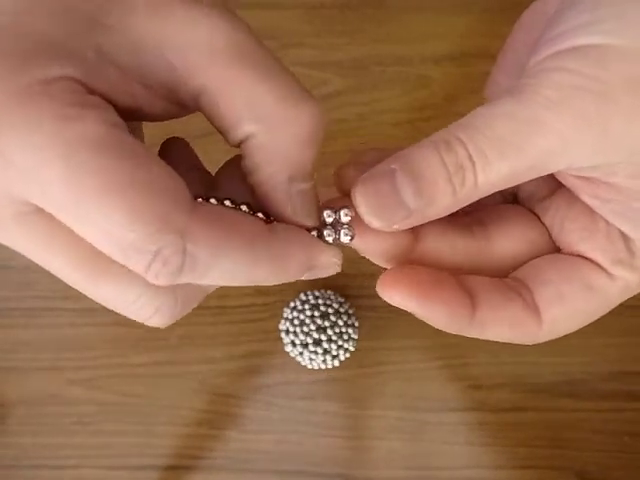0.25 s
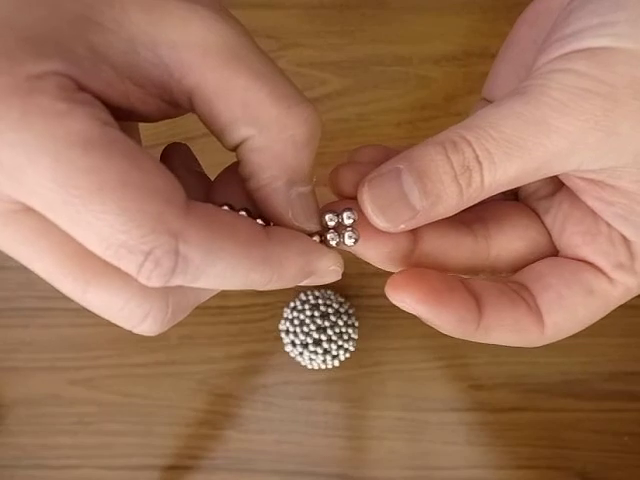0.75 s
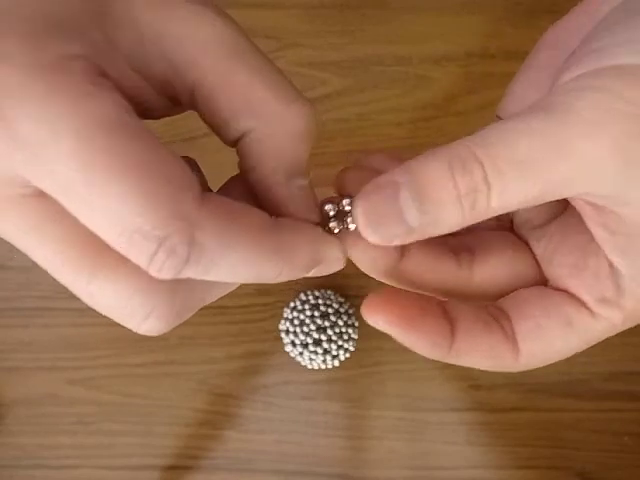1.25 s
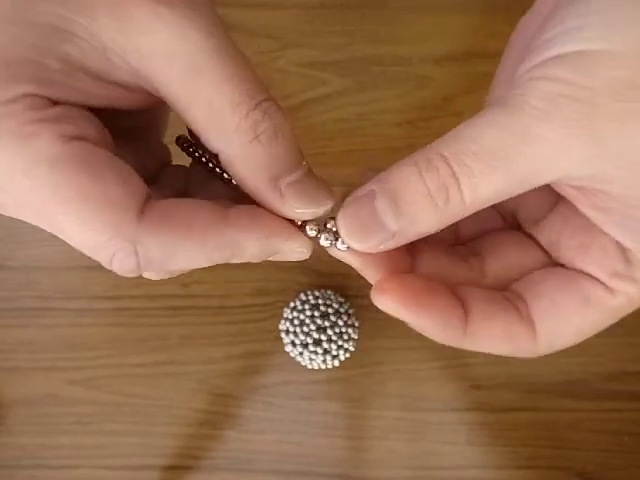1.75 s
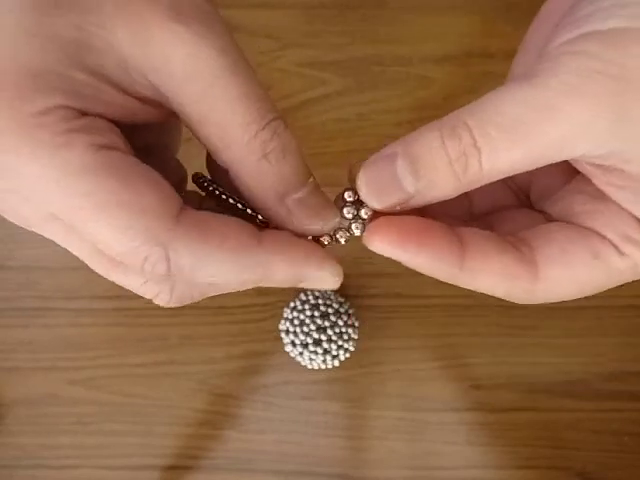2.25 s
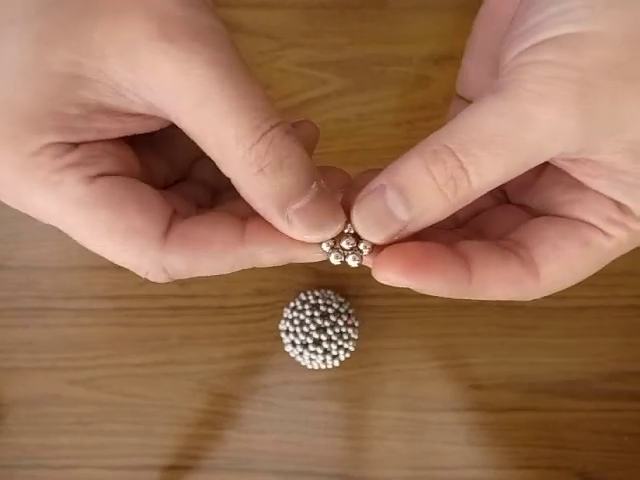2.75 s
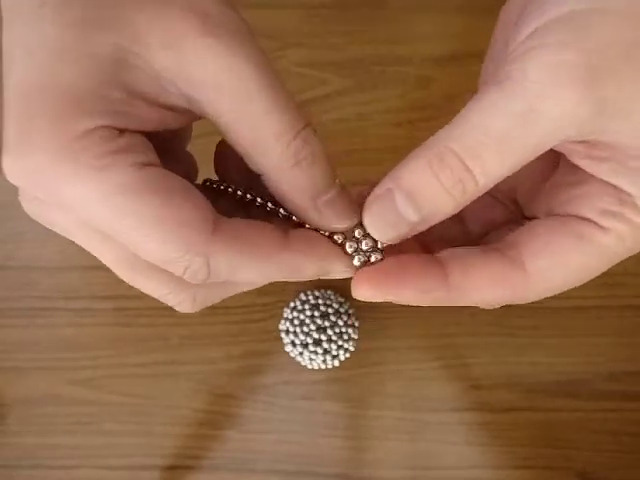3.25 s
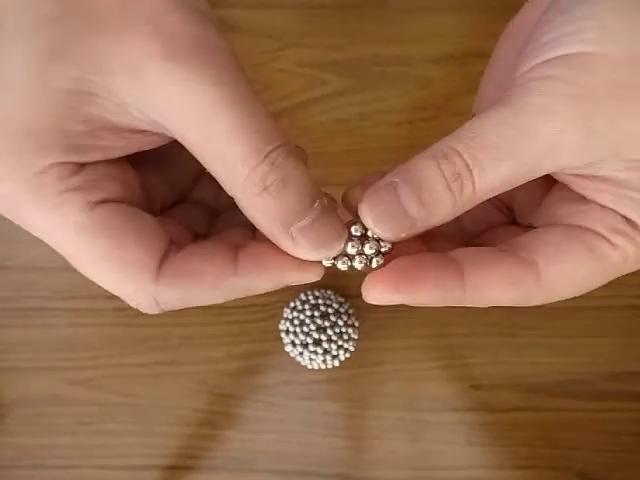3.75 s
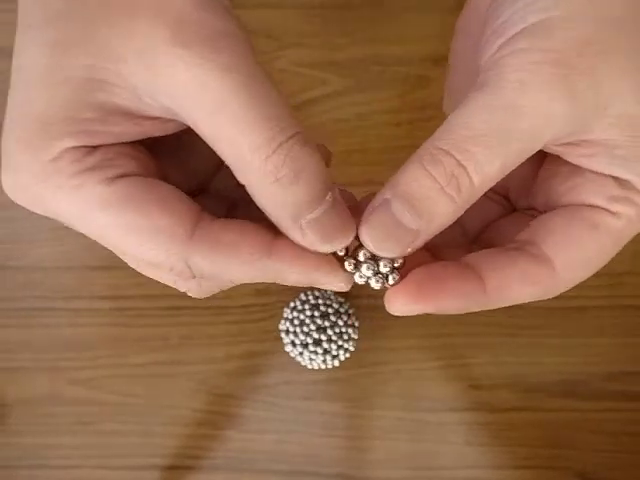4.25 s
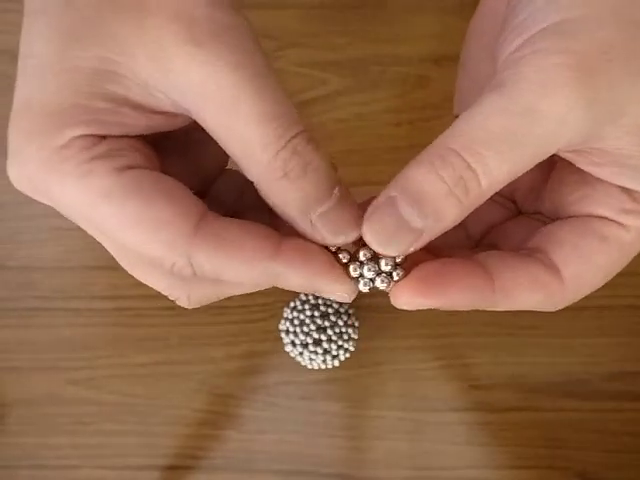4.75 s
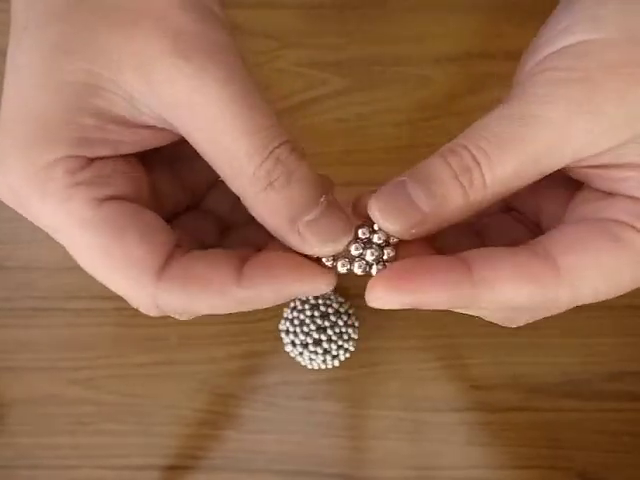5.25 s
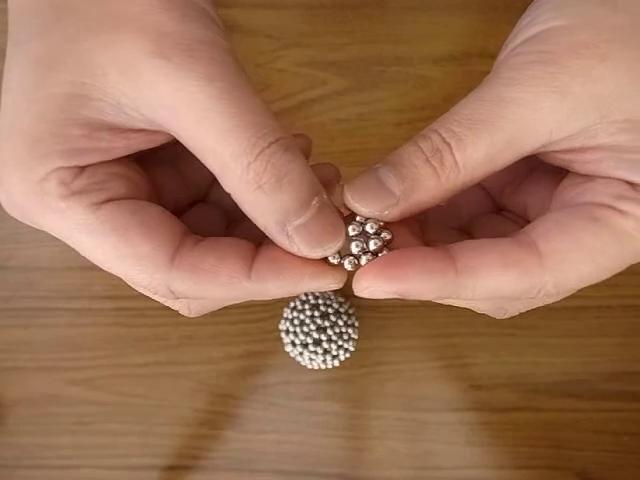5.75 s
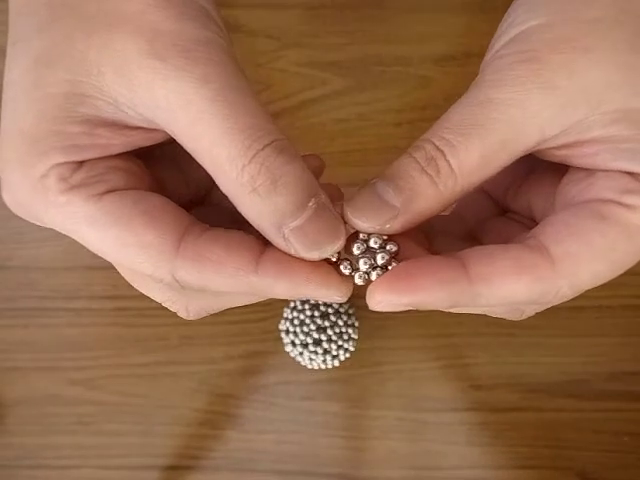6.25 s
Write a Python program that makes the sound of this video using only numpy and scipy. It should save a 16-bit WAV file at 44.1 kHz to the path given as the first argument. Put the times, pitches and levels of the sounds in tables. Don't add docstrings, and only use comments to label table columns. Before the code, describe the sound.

A steady low-level hiss with mains hum, very faint high whines and a short, grainy motor whirr once a second. Over it, fingers let tiny metal magnet balls jump together: sparse, dry, piercingly high clicks of varying strength, clustered around two to three seconds, then one strong snap past four and a nearly merged pair near the end. Close microphone, small quiet room, barely any echo from the tabletop.

```python
import sys
import numpy as np
from scipy import signal
from scipy.fft import rfft, irfft, next_fast_len
from scipy.io import wavfile
from scipy.ndimage import uniform_filter1d

SR = 44100
rng = np.random.default_rng(int(sys.argv[2]) if len(sys.argv) > 2 else 0)


def dump_mix(stems):
    frames = np.atleast_2d(stems).T
    limited = np.clip(frames, -1, 1)
    pcm = np.round(limited * 32767).astype(np.int16)
    wavfile.write(sys.argv[1], SR, pcm)


def convert_level_to_amplitude(level_db):
    exponent = np.asarray(level_db, float) / 20
    return 10 ** exponent


N = 287091


def spread_one(x):
    return x / np.sqrt(np.mean(x ** 2) + 1e-20)


def drift(rate_hz):
    pole = np.exp(-2 * np.pi * rate_hz / SR)
    wander = signal.lfilter([1], [1, -2 * pole, pole * pole], rng.standard_normal(N + SR))
    return spread_one(wander[SR:])


def hiss():
    # (frequency [Hz], density [dB per Hz])
    hiss_curve = [(3, -24), (14, -11.5), (30, -9.5), (55, -7), (90, -11), (170, -11), (340, -14),
                  (700, -16), (1650, -19.5), (3500, -21), (7000, -23), (14600, -23), (15300, -25.5),
                  (15800, -27.5)]
    # (centre [Hz], width [Hz], gain [dB])
    housing = [(2910, 220, -1.04), (3490, 200, 0.9), (7830, 500, 1.3), (8550, 300, -1.5), (9000, 300, 0.8),
               (12000, 700, 0), (13600, 600, 1.0)]
    size = next_fast_len(N)
    hz = np.maximum(np.arange(size // 2 + 1) * SR / size, 1)
    points, db = np.transpose(hiss_curve)
    ripples_db = sum(gain_db * np.exp(-((hz - centre_hz) / width_hz) ** 2)
                     for centre_hz, width_hz, gain_db in housing)
    colour = convert_level_to_amplitude(np.interp(np.log(hz), np.log(points), db) + ripples_db)
    noise = irfft(rfft(rng.standard_normal(size)) * colour, size)[:N]
    return convert_level_to_amplitude(-56.47) * spread_one(noise)


def tones():
    # (frequency [Hz], level [dB rms], pitch wander [Hz])
    steady_tones = [
        (59.8, -74, 4.12),
        (119.8, -65.5, 1.0),
        (339, -82.5, 1.0),
        (7260, -86.5, 3.0),
        (14427, -85, 3.0),
        (14756, -81, 3.0),
        (14900, -81, 3.0),
        (15500, -82, 2.0),
    ]
    total = np.zeros(N)
    for hz, db, wander_hz in steady_tones:
        phase = 2 * np.pi * np.cumsum(hz + wander_hz * drift(3.0)) / SR
        total += convert_level_to_amplitude(db + 3) * np.sin(phase)
    return total


def whirr():
    start_s, period_s, length_s = .17, .998, 0.207
    centre_hz, width_hz = 10500, 600
    running = (np.arange(N) / SR - start_s) % period_s < length_s
    gate = uniform_filter1d(running * 1., size=600)
    limits_hz = [centre_hz - width_hz / 2, centre_hz + width_hz / 2]
    resonance = signal.butter(1, limits_hz, "band", fs=SR, output="sos")
    noise = spread_one(signal.sosfilt(resonance, rng.standard_normal(N)))
    grain = convert_level_to_amplitude(-71 + 2.6 * drift(60.0))
    return grain * gate * noise


def stereo_flecks():
    fleck_borders = [4300, 5190, 5700, 6960, 8300, 9650, 11050, 12400, 13800, 14500, 15600]
    chance, fleck_db = .024, -74
    hop, first = 1024, 498
    side, hz = np.zeros(N + 3 * hop), np.arange(hop + 1) * SR / (2 * hop)
    rise = np.cumsum(np.kaiser(hop, 4 * np.pi))
    window = np.sqrt(np.r_[rise, rise[::-1]] / rise[-1])
    struck_bands = rng.random((N // hop, len(fleck_borders) - 1)) < chance
    for slot, band in np.argwhere(struck_bands):
        low_hz, high_hz = fleck_borders[band], fleck_borders[band + 1]
        inside = (hz > low_hz) & (hz < high_hz)
        noise = spread_one(irfft(rfft(rng.standard_normal(2 * hop)) * inside))
        width_db = 10 * np.log10((high_hz - low_hz) / 1200)
        at = first + slot * hop
        side[at:at + 2 * hop] += convert_level_to_amplitude(fleck_db + width_db) * window * noise
    return side[:N] * [[1], [-1]]


def room(x):
    # (level [dB], t60 [s])
    decays = [
        (-41, 0.055),
        (-52, 0.28),
    ]
    t = np.arange(SR // 2) / SR
    slopes = np.sqrt(sum(convert_level_to_amplitude(2 * (db - 60 * t / t60)) for db, t60 in decays))
    response = rng.standard_normal(len(t)) * slopes * (t > 1.7e-3)
    return signal.fftconvolve(x, response)[:N]


def struck(t, db, hz, swell_ms):
    age = 1000 * t / swell_ms
    return convert_level_to_amplitude(db) * np.sin(2 * np.pi * hz * t) * (age * np.exp(1 - age)) ** 2


def fingertip_tap():
    tap = np.zeros(N)
    tap[int(3.126 * SR):][:256] = struck(np.arange(256) / SR, -45.5, 1840, 0.38)
    return tap


def early_paths(t, chance):
    scatter_db, scatter_ms, table_echo_ms = -11.5, 2.4, 1.55
    fading = convert_level_to_amplitude(scatter_db - 10000 * t / scatter_ms)
    paths = fading * chance * (t > 2.5e-4) * (t < 1.9e-3)
    paths[round(table_echo_ms * SR / 1000)] += convert_level_to_amplitude(-2.5)
    return paths


def snaps():
    # (time [s], bright ring [dB], swell [ms], cluster mode [dB], ring sent to the room [Hz])
    contacts = [(1.636, -11.5, .2, -22.5, 14500), (2.03655, -24, 0.25, -43, 11800),
                (2.6738, -25.5, 0.19, -18.5, 14400), (2.8879, -15.5, .38, -22, 13100),
                (2.9321, -9.5, 0.38, -19.5, 14200), (3.126, -47, .2, -56, 13900),
                (4.0542, -37.5, .13, -38.5, 13300), (4.37805, -45, .25, -43, 12300),
                (4.4606, -7.5, 0.16, -9, 13500), (6.3775, -13, .19, -19, 13500),
                (6.3795, -5.5, .27, -7.5, 13400)]
    # (ball chain [dB], ball chain [Hz], finger gap [dB], finger gap [Hz])
    grips = [(-29, 6260, -49, 3300), (-41, 6640, -52, 3700), (-34, 6500, -37, 4100),
             (-27.5, 6600, -34.5, 4100), (-30.5, 6900, -45, 3860), (-65, 6500, -56, 4100),
             (-52, 7200, -58, 4100), (-62, 6500, -64, 4100), (-16, 7100, -33, 3780), (-31, 6600, -46, 3600),
             (-26.5, 6100, -31.5, 4800)]
    heard, spread, t = np.zeros(N + 512), np.zeros(N + 512), np.arange(256) / SR
    luck = rng.standard_normal((len(contacts), 256))
    for contact, grip, chance in zip(contacts, grips, luck):
        s, top_db, swell_ms, mid_db, sent_hz = contact
        chain_db, chain_hz, gap_db, gap_hz = grip
        top_hz = max(13600 + 37 * top_db + 0.27 * (sent_hz - 13700), 12700)
        mid_hz = 9170 - 41 * (mid_db - top_db)
        edge_db = top_db - 23 + 36 * swell_ms
        edge = -struck(t, edge_db, 15400, 0.34)
        bright = struck(t, top_db, top_hz, swell_ms) + edge

        cluster = struck(t, mid_db, mid_hz, .2)
        chain = struck(t, chain_db, chain_hz, 0.48)
        gap = struck(t, gap_db, gap_hz, 0.58)
        thud = struck(t, top_db + gap_db - 4.5, 1900, 0.46)
        lower = cluster + chain + gap + thud

        at = int(s * SR)
        paths = early_paths(t, chance)
        bright_back_db = -5 - 17 * (swell_ms / 0.42) ** 3
        for part, back_db in ((bright, bright_back_db), (lower, -9)):
            heard[at:at + 256] += part
            heard[at:at + 511] += convert_level_to_amplitude(back_db) * np.convolve(part, paths)

        sent_ring = struck(t, max(top_db, mid_db) + 4, sent_hz, 0.13)
        share = convert_level_to_amplitude(6 - 6.5 * swell_ms)
        spread[at:at + 256] += share * (sent_ring + .6 * edge + lower)
    return heard[:N], spread[:N]


def scene():
    heard, spread = snaps()
    quiet = room(spread) + hiss() + tones() + whirr()
    quiet_cut = signal.firwin(numtaps=601, cutoff=15800, fs=SR)
    mono = heard + fingertip_tap() + signal.fftconvolve(quiet, quiet_cut, "same")
    return np.array([mono, mono])


def band_limit(x):
    return signal.sosfilt(signal.butter(12, 17170, fs=SR, output="sos"), x)


def record(dry):
    mic_cut = signal.firwin(numtaps=111, cutoff=16500, fs=SR)
    filtered = signal.fftconvolve(dry, mic_cut[None], "same", axes=1)
    return band_limit(filtered + stereo_flecks())


dry = scene()
out = record(dry)
dump_mix(out)
```